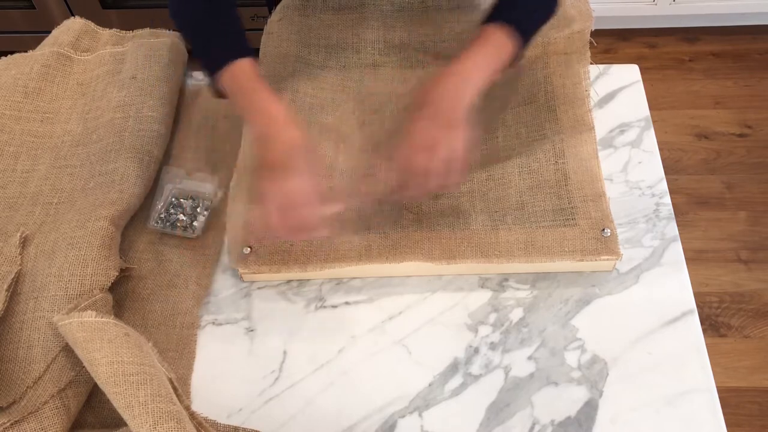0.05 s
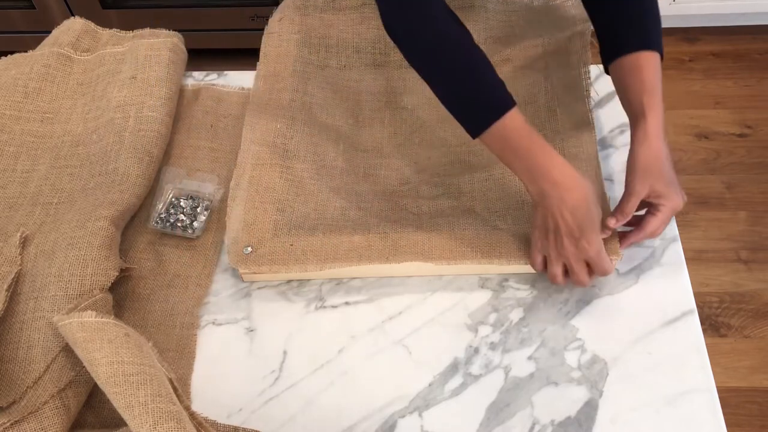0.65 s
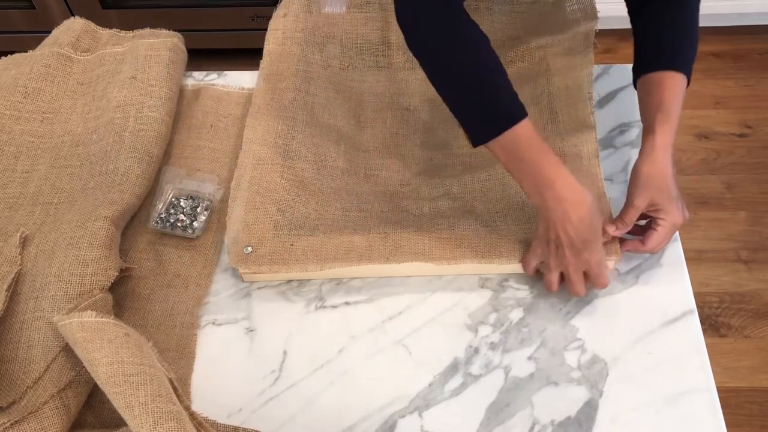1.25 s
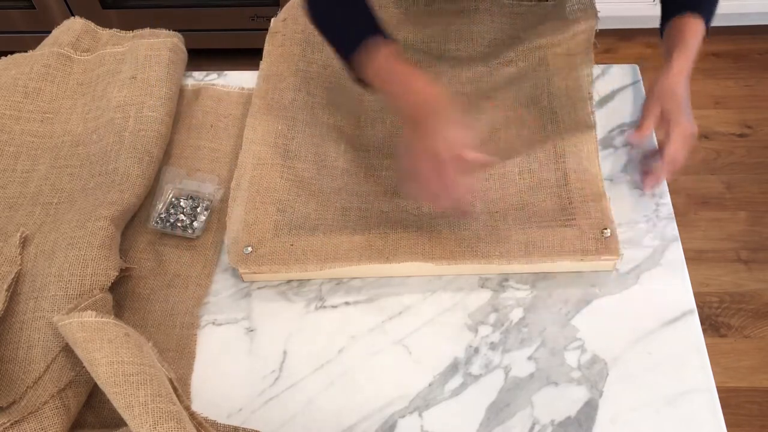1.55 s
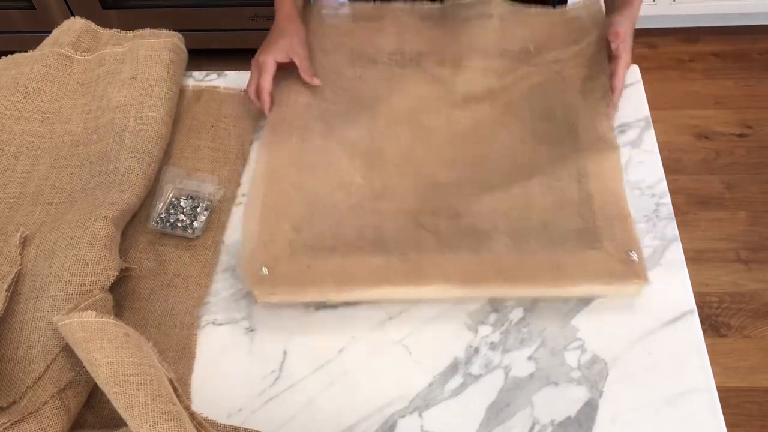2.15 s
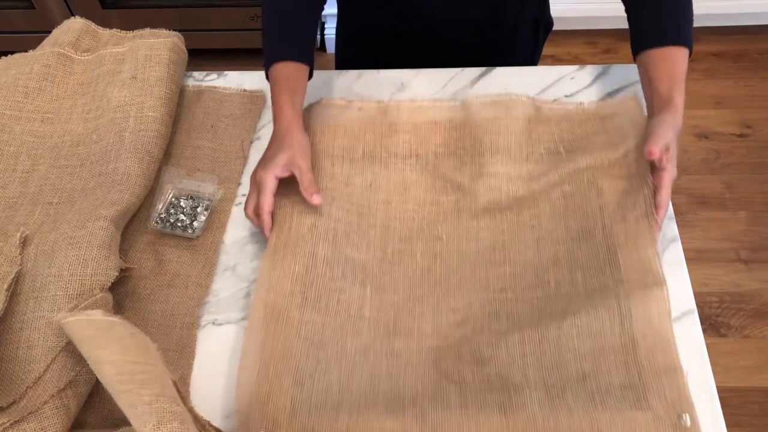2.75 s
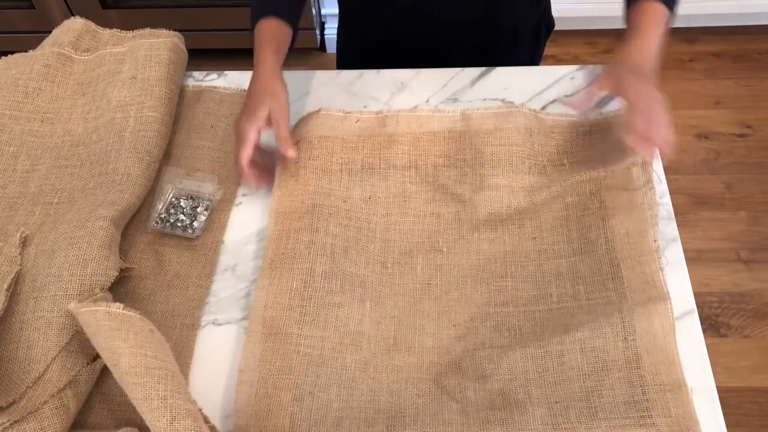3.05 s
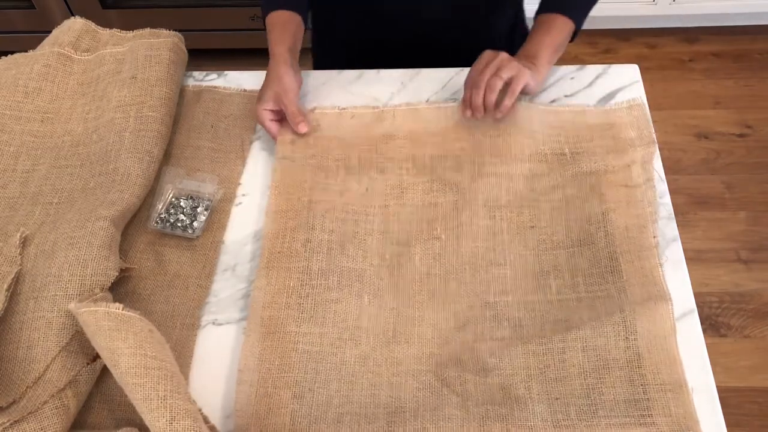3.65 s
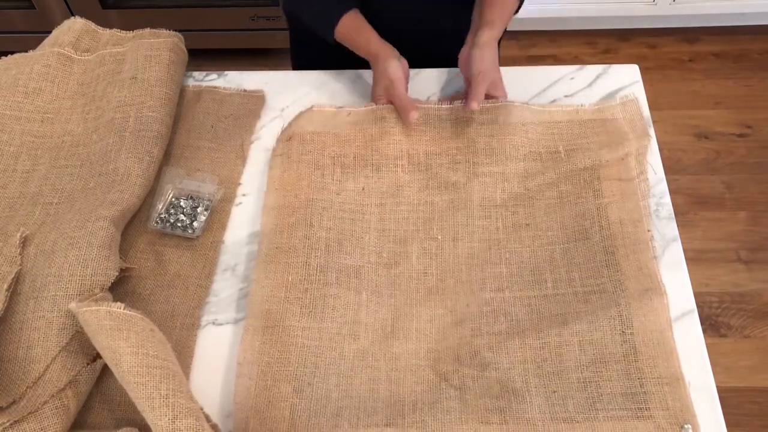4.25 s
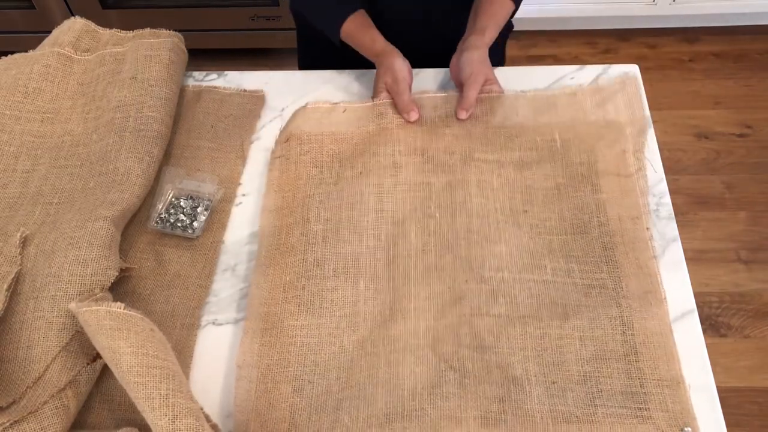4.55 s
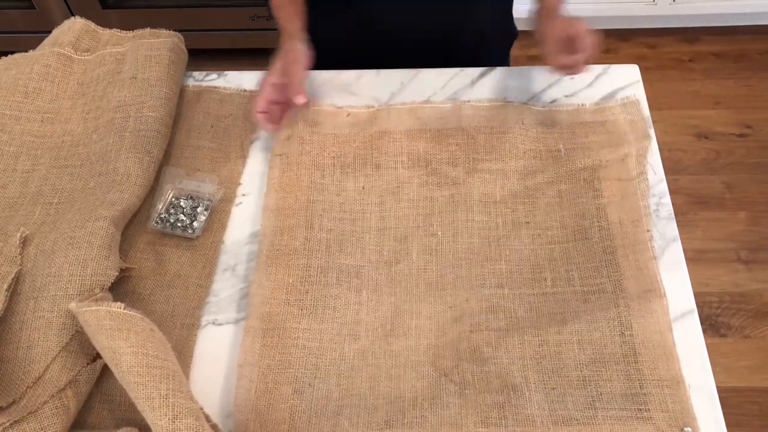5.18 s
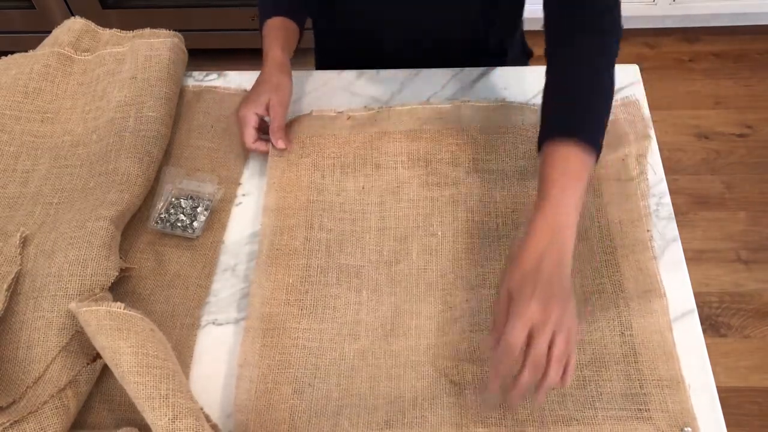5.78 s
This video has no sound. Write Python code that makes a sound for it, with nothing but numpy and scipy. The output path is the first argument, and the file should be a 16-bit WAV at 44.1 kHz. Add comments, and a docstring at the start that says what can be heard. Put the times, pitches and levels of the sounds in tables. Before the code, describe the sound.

In an echoing room with a low ventilation hum, burlap is handled on a wooden frame, heard from just above a stone counter. Faint scratchy pulls and muffled thumps come first as a tack goes in. The frame then clacks down on one edge and the other, scrapes, knocks once more and is nudged along in uneven rasps. A soft sweep of a hand over the cloth ends it.

```python
"""Pinning burlap to a wooden frame

On a stone counter in an echoing room, over a low ventilation rumble, fingers rub the cloth and
press in a thumbtack. The frame is set down on one edge, then the other, slid, tipped, dropped and
nudged along, and a palm smooths the weave. Knocks are fading wood tones; rubs are many tiny slips."""
import sys
import numpy as np
from scipy import signal
from scipy.fft import rfft, irfft, next_fast_len
from scipy.io import wavfile
from scipy.ndimage import map_coordinates

SR = 44100
rng = np.random.default_rng(int(sys.argv[2]) if len(sys.argv) > 2 else 0)


def generate_wav(signal):
    """Clip the signal to [-1, 1] and save it as 16-bit WAV at the path in sys.argv[1]."""
    frames = np.transpose(np.atleast_2d(signal))
    scaled = np.clip(frames, -1, 1) * 32767
    pcm = np.round(scaled).astype(np.int16)
    wavfile.write(sys.argv[1], SR, pcm)


N = 265482

# The tone of rubbed burlap and of wood on stone. Each row: frequency in Hz, level in dB.
BURLAP_TONE = [(300, -7), (700, -18), (1300, -2), (2500, -1.5), (4000, -10), (5500, -8.5), (7500, -11.5),
               (10000, -15.5), (12000, -17), (15500, -30)]
STONE_TONE = [(300, 4.5), (1000, -5), (1650, -3), (3000, -3.5), (4400, -10.5), (7500, -10), (9000, -10.5),
              (12500, -14), (15500, -12)]
# Resonances of the cloth-covered rail and the frame's edge. Each row: centre in Hz, width in Hz, gain in dB.
RAIL_PEAKS = [(1250, 130, 2), (2040, 75, -25), (2740, 110, 9), (3370, 110, 2), (4330, 150, 3.5),
              (5700, 130, -8), (7060, 690, 2), (7800, 150, 3)]
EDGE_PEAKS = [(1600, 220, 3), (2270, 170, 6), (2740, 150, 6), (3360, 270, 9.5), (4000, 180, 3),
              (7500, 400, 3), (10500, 800, 4), (14500, 1800, -3)]


def amp(db):
    """Turn decibels into a gain."""
    return 10 ** (np.asarray(db) / 20)


def unit(x):
    """Scale a sound to an average (rms) level of 1."""
    return x / np.sqrt(np.mean(x ** 2) + 1e-20)


def along(points, hz):
    """Read between (frequency, value) points on a logarithmic frequency scale."""
    freqs, values = np.transpose(points)
    return np.interp(np.log(hz + 1), np.log(freqs + 1), values)


def add(track, start, sound):
    """Mix a sound into the track, start seconds in."""
    part = track[round(start * SR):][:len(sound)]
    part += sound[:len(part)]


def wobble(rate):
    """A smooth curve through rate random values a second."""
    return map_coordinates(rng.standard_normal(int(N * rate / SR) + 4), [np.arange(N) * rate / SR])


def coloured(x, tone, peaks=()):
    """Filter a sound by a tone curve plus bell-shaped peaks and dips."""
    size = 2 * next_fast_len(len(x))
    freqs = np.fft.rfftfreq(size, 1 / SR)
    level = along(tone, freqs) + sum(db * np.exp(-((freqs - hz) / width) ** 2) for hz, width, db in peaks)
    cepstrum = irfft(np.log(amp(level)), size)
    cepstrum[1:size // 2] *= 2  # folded so that the filter rings only after a sound, never before
    cepstrum[size // 2 + 1:] = 0
    return irfft(rfft(x, size) * np.exp(rfft(cepstrum)), size)[:len(x)]


def echoed(x, extra_db=0):
    """The counter and cabinets throw back quick echoes, timed a little differently for each sound."""
    echoes = [(.0022, 2.5), (.0039, -2), (.0066, -10.5), (0.0137, -17), (0.02, -8)]  # Each row: delay in seconds, relative level in dB.
    out = x.copy()
    for delay, db in echoes:
        add(out, delay * rng.uniform(.85, 1.15), amp(db + extra_db) * x)
    return out


def in_room(x, wet_db, build_s=0.0028):
    """Add the room's wash of echoes, which builds up as the first walls answer."""
    fade_times = [(100, 0.67), (300, 0.59), (700, 0.68), (1600, 0.76), (3000, 0.55), (7000, 0.53),
                  (15000, 0.11)]  # Each row: frequency in Hz, t60 (seconds to fade by 60 dB).
    wall_tone = [(100, 3.5), (250, 3), (420, -3.5), (650, 0), (1000, -7), (1700, -4.5), (2700, -7.5),
                 (3800, -3.5), (7000, -8), (15000, -9)]  # Each row: frequency in Hz, gain in dB.
    hz, t, noise = signal.stft(rng.standard_normal(SR), SR, nperseg=256)
    tail = signal.istft(noise * amp(-60 * t / along(fade_times, hz)[:, None]), SR, nperseg=256)[1]
    build_up = 1 - np.exp(-(np.arange(len(tail)) / SR / build_s) ** 2)
    tail = unit(tail * build_up) / np.sqrt(len(tail))
    return x + amp(wet_db) * signal.fftconvolve(x, coloured(tail, wall_tone))[:len(x)]


def strokes(rows, swell_share, sag_db_per_s, release_t60):
    """The loudness of rubs: each swells for a share of its length, eases off and dies away."""
    power = np.zeros(N)
    for start, length, db in rows:
        t = np.maximum(np.arange(N) / SR - start, 0)
        swell = np.minimum(t / (swell_share * length), 1)
        fade_db = sag_db_per_s * t + 60 * np.maximum(t - length, 0) / release_t60
        power += (swell * amp(db - fade_db)) ** 2
    return np.sqrt(power)


def friction(tone, peaks, rate, spread_db, hiss, flutter_db):
    """Rubbing: tiny slips of uneven size, about rate a second, over a smooth hiss."""
    slips = (rng.random(N) < rate / SR) * rng.standard_normal(N)
    slips *= amp(spread_db * np.minimum(rng.exponential(size=N), 4))
    rub = unit(slips) + hiss * rng.standard_normal(N)
    rub *= amp(flutter_db * wobble(60))
    return unit(echoed(coloured(rub, tone, peaks), extra_db=-12))


def ventilation():
    """Moving air rumbles steadily under two wavering fan tones."""
    # The air's tone and the fan's hum. Each row: frequency in Hz, relative level in dB.
    air_tone = [(15, -43), (32, -39), (42, -25), (58, -4), (80, -8), (115, -3), (200, -7), (290, -3),
                (400, -11), (520, -14.5), (750, -16), (1100, -26), (1600, -29.5), (3000, -34.5),
                (8000, -40), (15500, -43)]
    fan_tones = [(118, -61.5), (299, -66)]
    t = np.arange(N) / SR
    hum = sum(amp(db + 3 * wobble(7)) * np.sin(2 * np.pi * hz * t + 1.1 * wobble(14))
              for hz, db in fan_tones)
    return amp(-55) * unit(coloured(rng.standard_normal(N), air_tone)) + hum


def tack_box(db=-66, hz=3650, width_hz=450, t60=0.49):
    """Loose tacks settle in their box: a faint, bright noise that fades at the very start."""
    jingle = unit(coloured(rng.standard_normal(N), BURLAP_TONE, [(hz, width_hz, 16)]))
    return amp(db - 60 * np.arange(N) / SR / t60) * jingle


def pulled_burlap():
    """Burlap rasps as fingers pull it, and zips when drawn fast over a rail."""
    # Ordinary and fast pulls. Each row: start in seconds, length in seconds, relative level in dB.
    pulls = [(0.57, 0.079, -71), (0.757, 0.038, -67.5), (0.83, 0.073, -66), (1.19, 0.08, -75),
             (1.272, 0.033, -69), (1.372, 0.055, -62), (1.95, 0.094, -71.5), (2.08, 0.18, -67),
             (2.205, 0.13, -58.5), (3.302, 0.032, -65), (3.335, 0.012, -68), (3.36, 0.047, -69)]
    fast_pulls = [(1.374, 0.053, -59), (2.198, 0.057, -52)]
    zip_tone = [(500, -2), (2500, -7), (4000, -31), (5700, -11), (6300, 0.5), (6750, -3), (7150, -3),
                (8000, -9), (10000, -15), (15500, -10)]  # Each row: frequency in Hz, level in dB.
    shape = dict(swell_share=0.2, sag_db_per_s=5, release_t60=0.064)
    rasp = friction(BURLAP_TONE, RAIL_PEAKS, rate=1600, spread_db=2.2, hiss=.9, flutter_db=1.3)
    zipping = friction(zip_tone, [], rate=800, spread_db=4, hiss=1, flutter_db=1.5)
    return amp(3.5) * strokes(pulls, **shape) * rasp + strokes(fast_pulls, **shape) * zipping


def thread_snaps(t60=0.031):
    """Single coarse threads snap, each a tiny burst of noise."""
    snaps = [(0.686, -59), (1.358, -56.5), (2.116, -58.5), (2.259, -56), (2.684, -50.5), (2.786, -50),
             (3.31, -57), (3.352, -42), (3.357, -56), (5.672, -54.5)]  # Each row: start in seconds, level in dB.
    out, t = np.zeros(N), np.arange(SR // 10) / SR
    for start, db in snaps:
        noise = unit(coloured(rng.standard_normal(len(t)), BURLAP_TONE, RAIL_PEAKS))
        add(out, start, amp(db - 60 * t / t60) * noise)
    return in_room(out, wet_db=-2)


def frame_hit(cutoff_hz, thud_db, crack_db, place, crack_t60=0.0095):
    """One hit, from a corner (place 0) to mid-rail (1): the wood rings and its surface cracks."""
    # The frame's short tones. Each row: pitch in Hz, t60 in seconds, dB at a corner, dB at mid-rail.
    wood_tones = [(116.3, 0.091, -18, -16.5), (151, 0.064, -16.5, -8.5), (192, 0.069, -18.5, -7),
                  (289, 0.043, -15, -8.5), (520, 0.021, -8, -6.5), (605, 0.017, -6.5, -4),
                  (725, 0.032, -16.5, -1.5), (929, 0.023, -8, -7), (1115, 0.018, -7, -3),
                  (1370, 0.018, -7, -3), (1647, 0.012, 3.5, -9.5), (2190, 0.012, -2.5, -15.5),
                  (2400, 0.014, -1, -10), (2685, 0.0071, -7.5, -2.5), (3310, 0.0087, -15.5, -16)]
    # Its faint lingering ring. Each row: pitch in Hz, level in dB, t60 in seconds.
    ring_tones = [(281, -30, 0.46), (509, -30.5, 0.41), (583, -36.5, 0.5), (675, -25, 0.26),
                  (743, -49, 0.19), (916, -26.5, 0.25), (1063, -37, 0.33), (1380, -36.5, 0.27),
                  (1610, -37, 0.33), (1603, -50, 0.27), (1820, -33, 0.51), (2170, -38, 0.22),
                  (2390, -41, 0.35), (2518, -44, 0.2)]
    crack_tone = [(500, 9), (2500, -27), (3800, 4), (5200, -6.5), (6800, 0.5), (7800, -4), (9500, -11.5),
                  (13500, -10), (16000, -12)]  # Each row: frequency in Hz, level in dB.
    t = np.arange(SR) / SR
    body = np.zeros(SR)
    for k, (hz, t60, corner_db, rail_db) in enumerate(wood_tones):
        bass_db = thud_db / (1 + (hz / 500) ** 4)
        db = np.interp(place, [0, 1], [corner_db, rail_db]) + bass_db + rng.normal()
        pitch = hz * (1 + rng.normal(0, 0.015))
        body += (-1) ** k * amp(db - 60 * t / t60) * np.sin(2 * np.pi * pitch * t)
    ring = sum(amp(db - 60 * t / t60) * np.sin(2 * np.pi * (hz * t + rng.random()))
               for hz, db, t60 in ring_tones)
    wood = body + ring * (1 - np.exp(-t / 0.0069))
    wood = signal.lfilter(*signal.butter(2, cutoff_hz, fs=SR), wood)  # a softer touch is duller
    wood = signal.lfilter(*signal.butter(2, 90, "high", fs=SR), wood)  # the wood's sound is thinned below about 90 Hz
    crack = unit(coloured(rng.standard_normal(SR), crack_tone)) * amp(-60 * t / crack_t60)
    return wood + amp(crack_db) * crack


def hand_bumps():
    """Hands and tack bump the frame softly; skin makes hardly any crack."""
    # Each row: start in seconds, level in dB, treble cut-off in Hz, bass boost in dB.
    bumps = [(0.822, -48, 275, 20), (0.847, -43, 295, 8), (0.911, -38.5, 800, 9), (0.923, -41.5, 700, 8),
             (1.551, -41, 380, 18), (1.553, -53, 2800, 5), (1.57, -38.5, 220, 4), (1.990, -50, 720, 7),
             (2.028, -44, 350, 6), (2.208, -46.5, 696, 19.5), (3.761, -43, 520, 13),
             (4.625, -55, 400, 23.5), (5.542, -54, 1100, -3)]
    out = np.zeros(N)
    for start, db, cutoff_hz, thud_db in bumps:
        hit = frame_hit(cutoff_hz, thud_db, crack_db=-46, place=0.76)
        add(out, start, amp(db) * in_room(echoed(hit), wet_db=-4))
    return out


def thumbtack(start=.914):
    """As the tack sinks home the rail rings, until the hand damps it."""
    rail_tones = [(629, -43, 0.27), (915, -47.5, 0.076), (1028, -53, 0.2)]  # Each row: pitch in Hz, level in dB, t60 in seconds.
    out, t = np.zeros(N), np.arange(SR // 2) / SR
    attack = 1 - np.exp(-t / 0.0013)
    damping = 1 / (1 + (t / .09) ** 10)
    ring = sum(amp(db - 60 * t / t60) * np.sin(2 * np.pi * hz * t) for hz, db, t60 in rail_tones)
    add(out, start, damping * attack * ring)
    return in_room(out, wet_db=-12.5)


def palm():
    """A flat hand smooths the weave with a duller brushing sound."""
    sweeps = [(1.476, 0.027, -63), (1.548, .03, -72), (2.295, 0.037, -60), (5.28, 0.03, -79),
              (5.405, 0.016, -75), (5.578, 0.032, -67), (5.662, 0.044, -61), (5.76, 0.115, -61),
              (5.93, .04, -68.5)]  # Each row: start in seconds, length in seconds, level in dB.
    palm_tone = [(200, -11), (800, 6.5), (1500, 5.5), (3200, 6.5), (4200, -1.5), (7000, -5), (9500, -3),
                 (11000, -10), (15500, -10)]  # Each row: frequency in Hz, level in dB.
    rub = friction(palm_tone, [], rate=2500, spread_db=2.1, hiss=.9, flutter_db=1.1)
    return strokes(sweeps, swell_share=0.27, sag_db_per_s=22, release_t60=0.23) * rub


def sleeves():
    """Sleeves and loose fibres brush the cloth with a fine whisper."""
    brushes = [(1.79, 0.06, -68), (1.94, 0.071, -66), (2.05, .04, -69), (2.22, 0.13, -68),
               (2.43, 0.16, -66), (3.303, 0.035, -58.5), (3.53, .1, -69)]  # Each row: start in seconds, length in seconds, level in dB.
    sleeve_tone = [(500, -10), (3000, 2), (8000, 0.5), (12000, -0.5), (15000, 4)]  # Each row: frequency in Hz, level in dB.
    whisper = unit(coloured(rng.standard_normal(N), sleeve_tone))
    return strokes(brushes, swell_share=0.39, sag_db_per_s=18, release_t60=0.39) * whisper


def counter_knocks():
    """The wooden frame lands hard on the stone."""
    # Each row: start in seconds, level in dB, treble cut-off in Hz, bass boost in dB, crack in dB,
    # room echo in dB, place from 0 (corner) to 1 (mid-rail).
    knocks = [(2.5381, -27, 5000, -11, -3.5, -0.5, 0.51), (2.5414, -16.5, 3280, -1, -22, -3, 0.49),
              (2.5528, -35, 2600, 1, -32, -5, 0.21), (2.5625, -28, 3650, 9.5, -20, -3, 0.21),
              (2.573, -34, 4200, 6.5, -15, -8, 0.26), (2.8053, -18.5, 3430, -11, -19, -7, 0.5),
              (2.8092, -30.5, 3000, 1, -29, 2.5, 0.5), (3.842, -17.5, 2900, -1, -18, -3.5, 0.91)]
    out = np.zeros(N)
    for start, db, cutoff_hz, thud_db, crack_db, room_db, place in knocks:
        hit = frame_hit(cutoff_hz, thud_db, crack_db, place)
        add(out, start, amp(db) * in_room(echoed(hit), room_db))
    return out


def slide():
    """The frame scrapes over the stone, shoved while flat and then nudged along on one edge."""
    # Each row: start in seconds, length in seconds, relative level in dB.
    shoves = [(2.57, 0.31, -65.5), (2.805, 0.23, -51.5)]
    nudges = [(3.645, 0.049, -58), (3.725, 0.076, -57.5), (3.82, 0.018, -47), (3.85, 0.14, -57.5),
              (3.99, 0.16, -62)]
    # Resonances of the frame lying flat. Each row: centre in Hz, width in Hz, gain in dB.
    flat_peaks = [(1600, 420, 4.4), (2250, 77, 5), (2710, 170, 12.7), (6530, 480, 1.3)]
    shape = dict(swell_share=0.27, sag_db_per_s=5.8, release_t60=0.17)
    flat = friction(STONE_TONE, flat_peaks, rate=2200, spread_db=2.2, hiss=.9, flutter_db=1.1)
    edge = friction(STONE_TONE, EDGE_PEAKS, rate=1500, spread_db=2.5, hiss=.8, flutter_db=1.3)
    scrape = amp(3) * strokes(shoves, **shape) * flat + amp(-0.1) * strokes(nudges, **shape) * edge
    return in_room(scrape, wet_db=-1.5)


def push(split_hz=4500):
    """Thumbs ease the frame forward in uneven swells: the rail rasps under a fibrous hiss."""
    swells = [(4.38, -72, -80), (4.412, -63.5, -77), (4.442, -54.5, -69), (4.486, -63, -71),
              (4.498, -63, -65), (4.512, -62.5, -71), (4.554, -53.5, -60.5), (4.626, -63, -64.5),
              (4.772, -53.5, -62), (4.822, -57, -74), (4.844, -69, -73), (4.888, -67, -64),
              (4.92, -58, -71), (4.928, -64, -66.5), (5.072, -64.5, -72), (5.1, -82, -82), (5.12, -81, -83)]  # Each row: time in seconds, relative rasp level in dB, treble level in dB.
    times, rasp_db, treble_db = np.transpose(swells)
    rub = friction(STONE_TONE, EDGE_PEAKS, rate=2600, spread_db=2, hiss=.9, flutter_db=1)
    out = np.zeros(N)
    for side, curve_db in (("low", rasp_db - 1), ("high", treble_db)):
        band = unit(signal.sosfilt(signal.butter(4, split_hz, side, fs=SR, output="sos"), rub))
        out += amp(np.interp(np.arange(N) / SR, times, curve_db, left=-120, right=-120)) * band
    return in_room(out, wet_db=-6.5)


def scene():
    """Everything at one microphone above the counter."""
    wood = counter_knocks() + hand_bumps() + thumbtack() + slide() + push()
    cloth = thread_snaps() + in_room(pulled_burlap() + palm() + sleeves(), wet_db=-1.5)
    return (wood + cloth + ventilation() + tack_box())[None]


def record(dry, low_hz=45, top_hz=15570):
    """The microphone thins the deepest bass, and nothing above top_hz is kept."""
    thinned = signal.lfilter(*signal.butter(2, low_hz, "high", fs=SR), dry)
    size = next_fast_len(N + SR // 2)
    kept = np.fft.rfftfreq(size, 1 / SR) < top_hz
    return irfft(rfft(thinned, size) * kept, size)[..., :N]


dry = scene()
out = record(dry)
generate_wav(out)
```